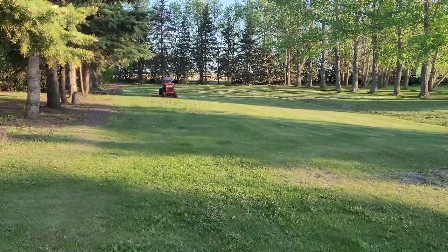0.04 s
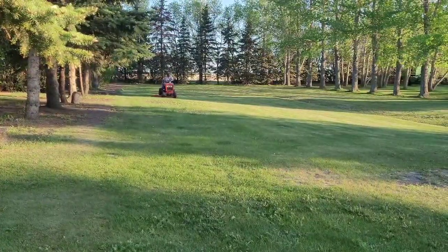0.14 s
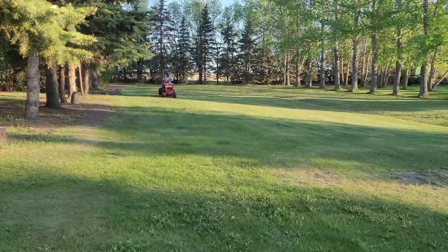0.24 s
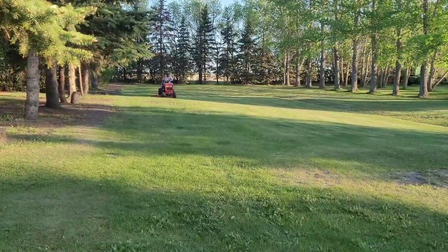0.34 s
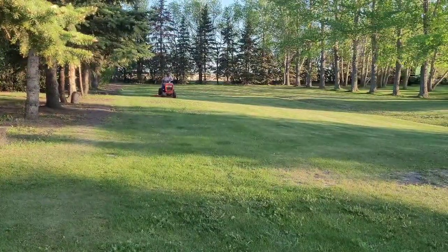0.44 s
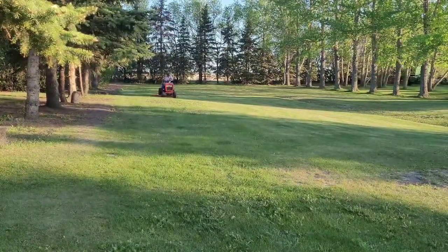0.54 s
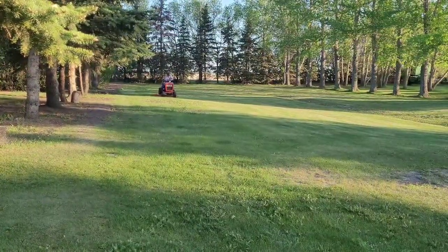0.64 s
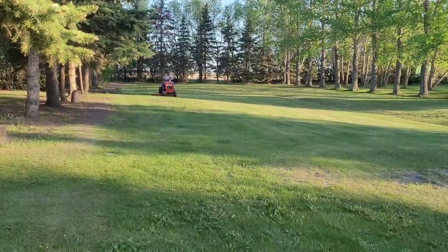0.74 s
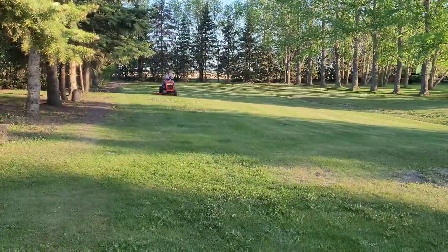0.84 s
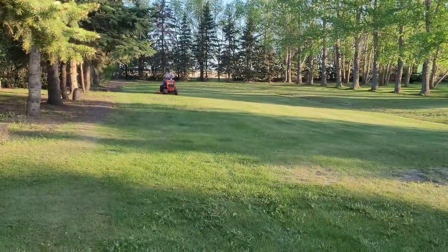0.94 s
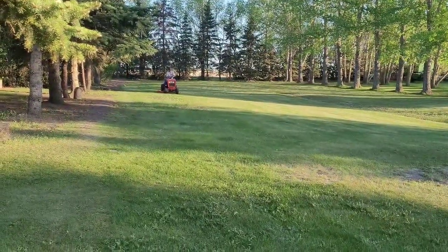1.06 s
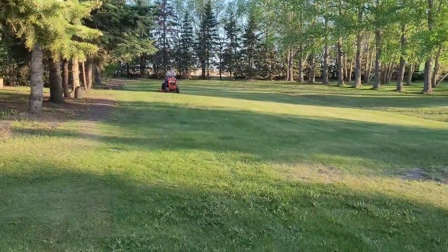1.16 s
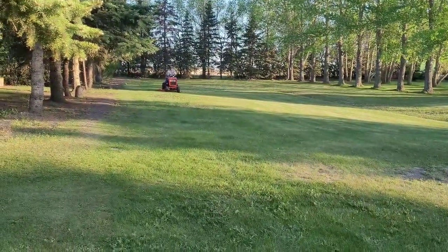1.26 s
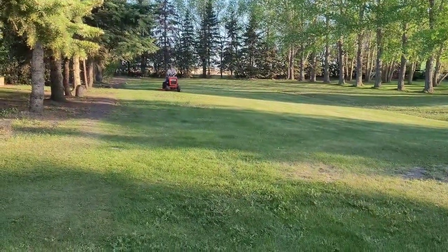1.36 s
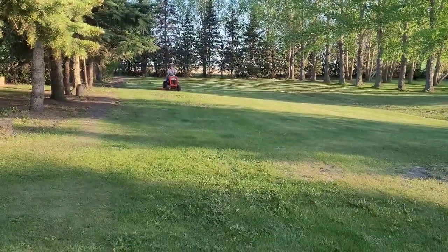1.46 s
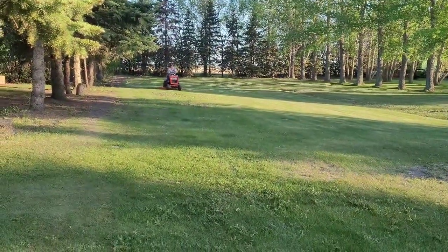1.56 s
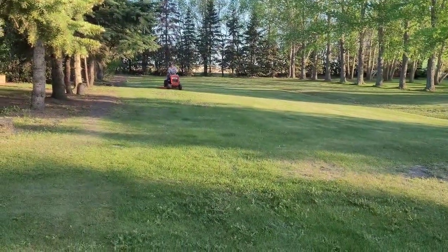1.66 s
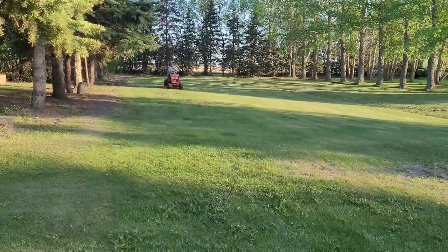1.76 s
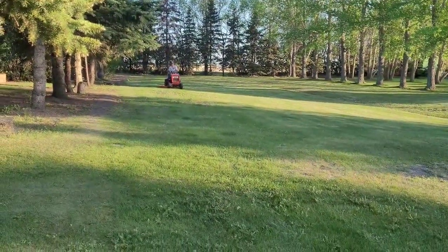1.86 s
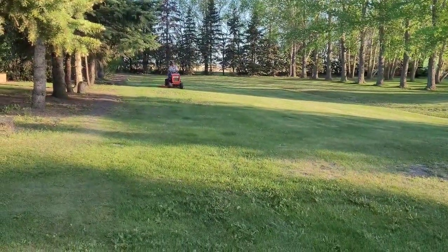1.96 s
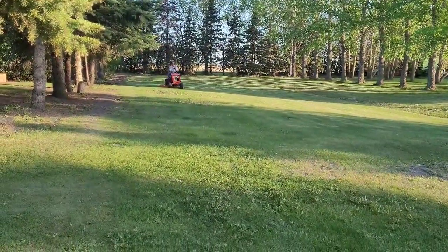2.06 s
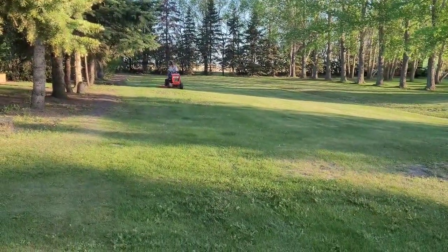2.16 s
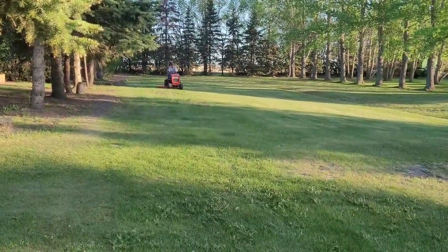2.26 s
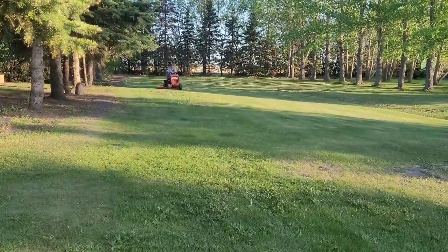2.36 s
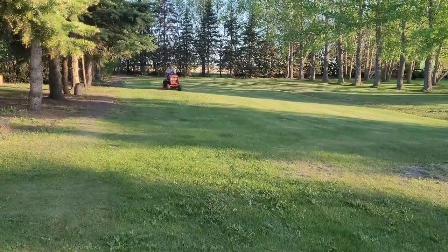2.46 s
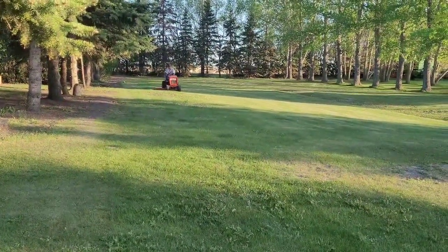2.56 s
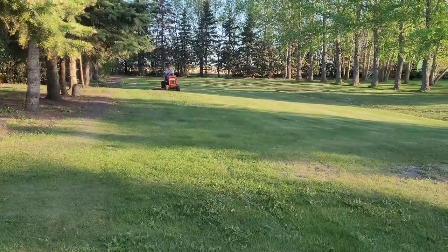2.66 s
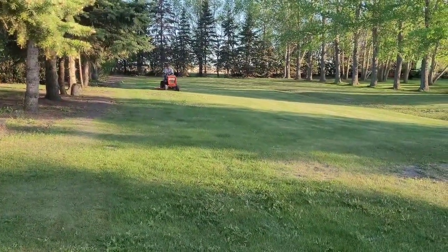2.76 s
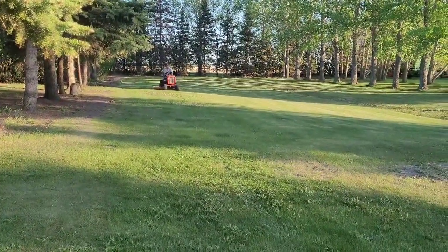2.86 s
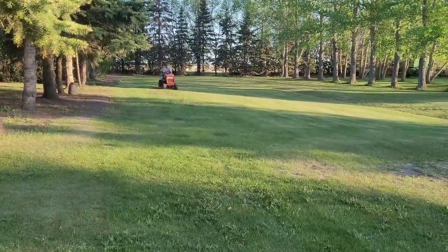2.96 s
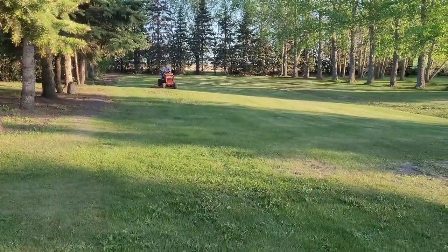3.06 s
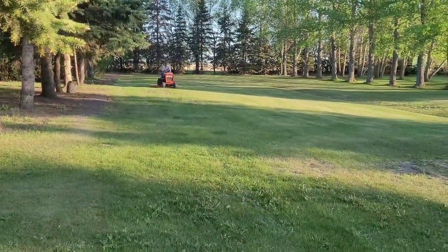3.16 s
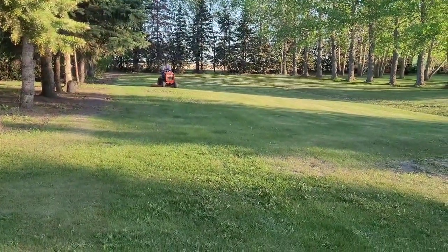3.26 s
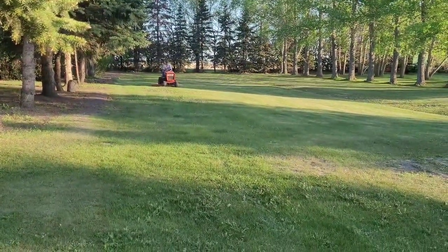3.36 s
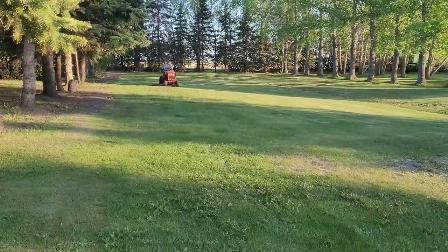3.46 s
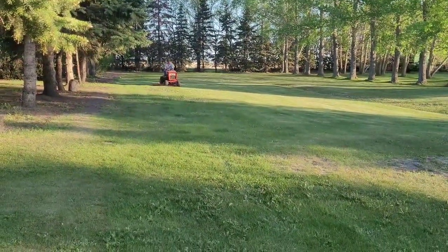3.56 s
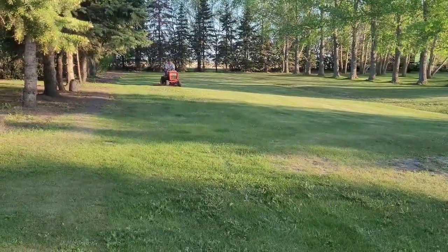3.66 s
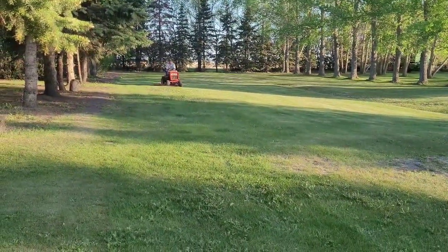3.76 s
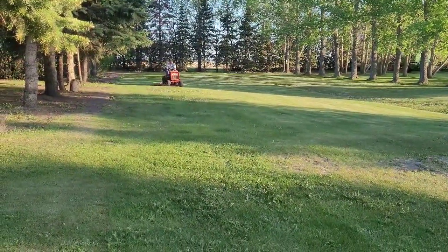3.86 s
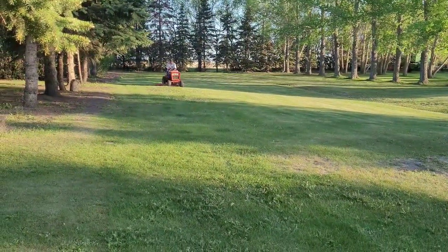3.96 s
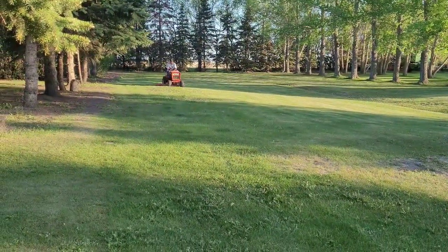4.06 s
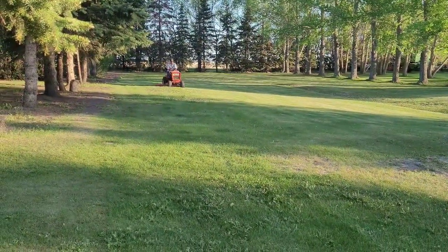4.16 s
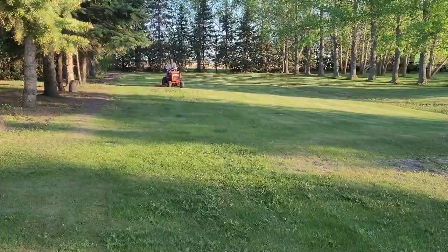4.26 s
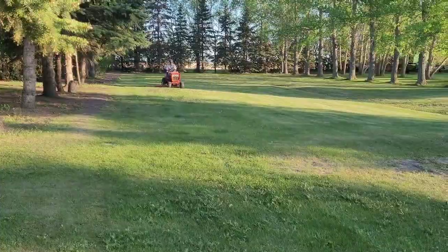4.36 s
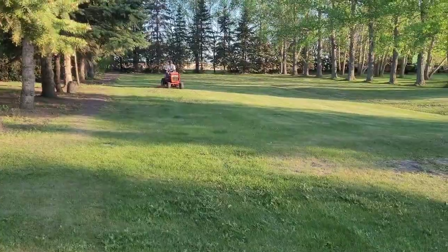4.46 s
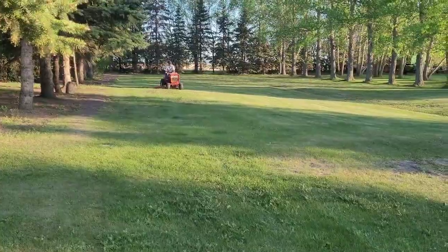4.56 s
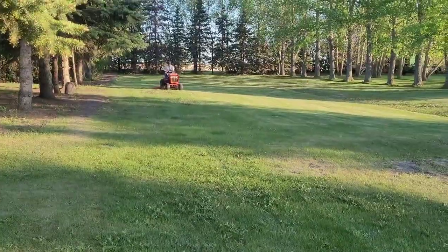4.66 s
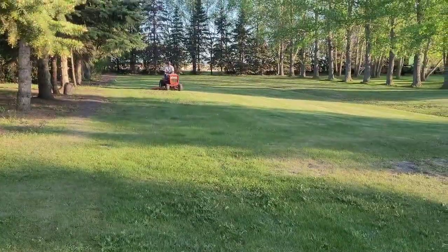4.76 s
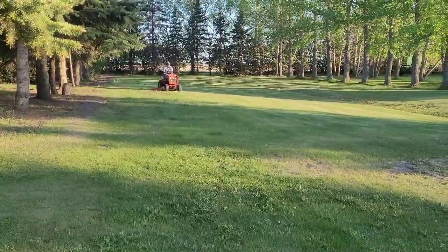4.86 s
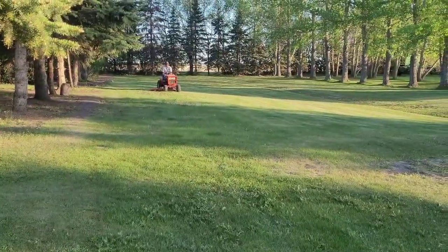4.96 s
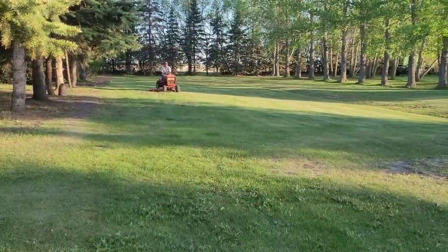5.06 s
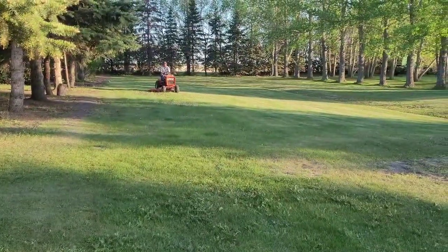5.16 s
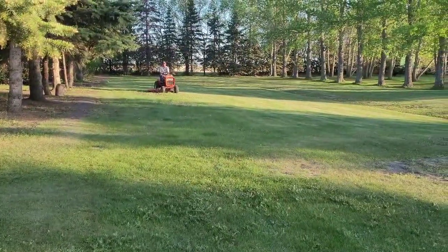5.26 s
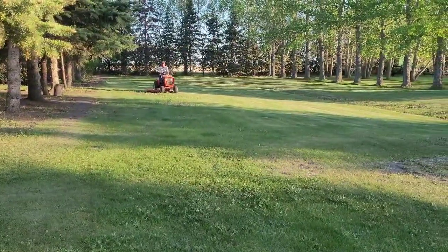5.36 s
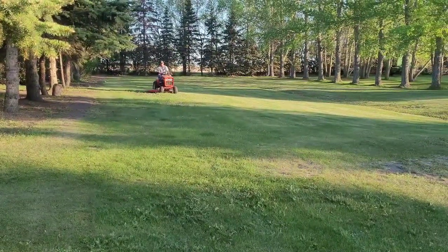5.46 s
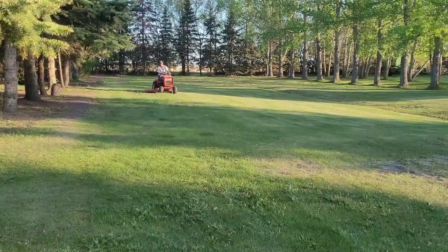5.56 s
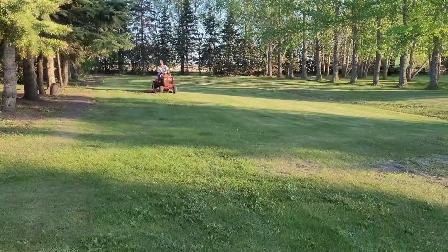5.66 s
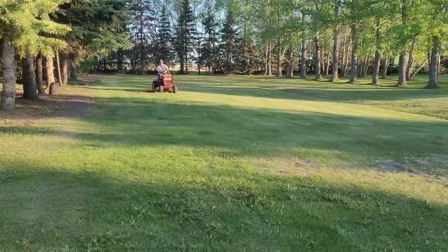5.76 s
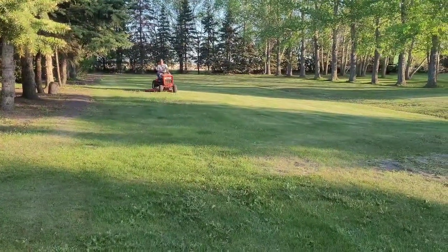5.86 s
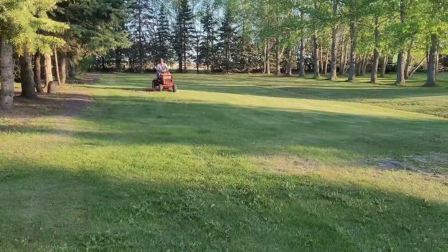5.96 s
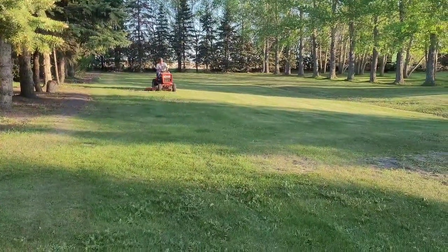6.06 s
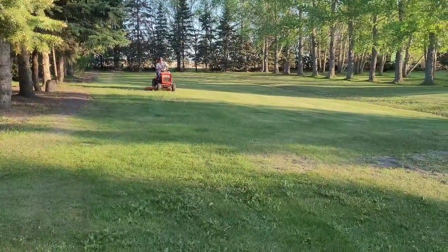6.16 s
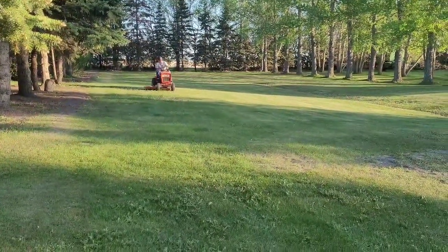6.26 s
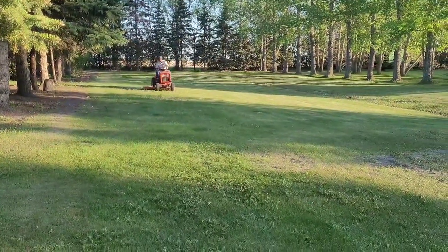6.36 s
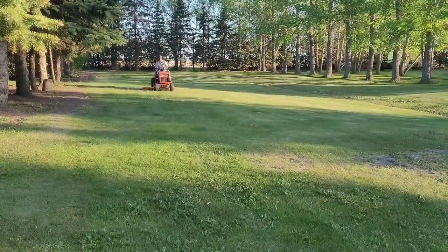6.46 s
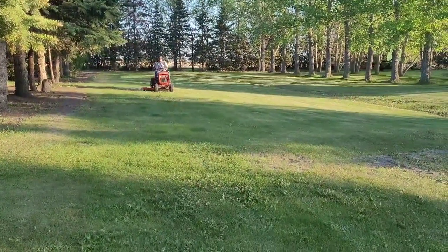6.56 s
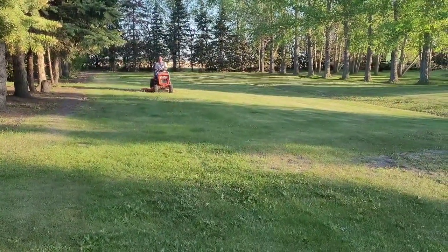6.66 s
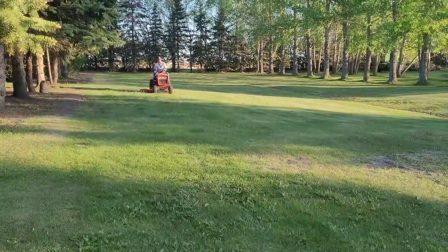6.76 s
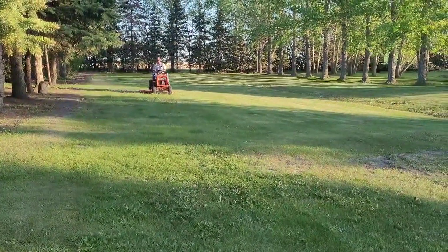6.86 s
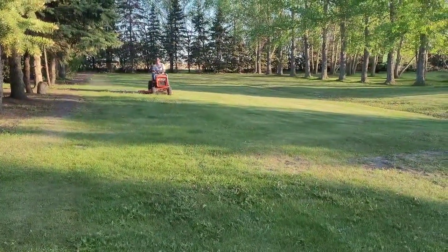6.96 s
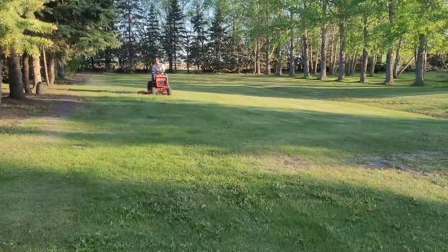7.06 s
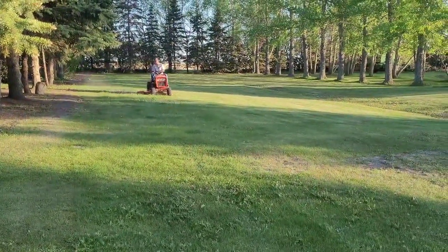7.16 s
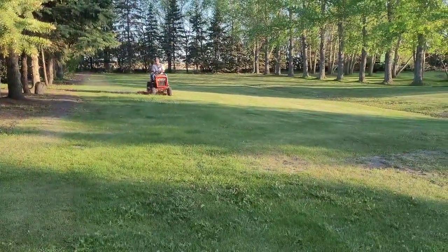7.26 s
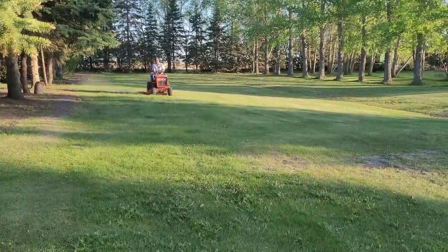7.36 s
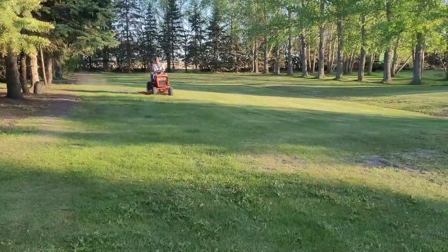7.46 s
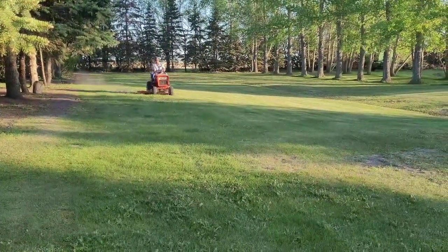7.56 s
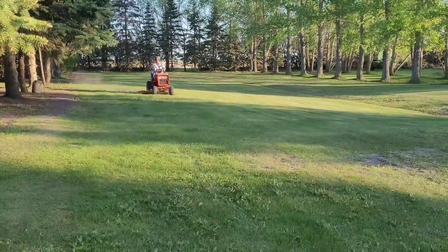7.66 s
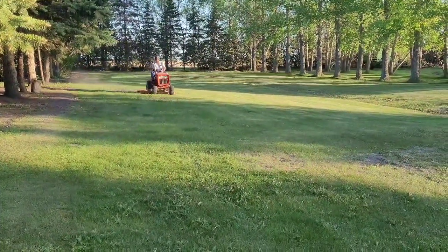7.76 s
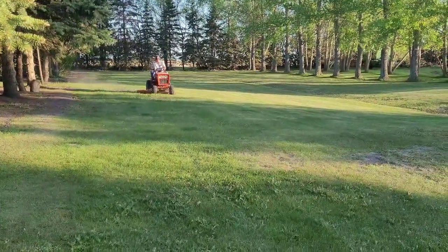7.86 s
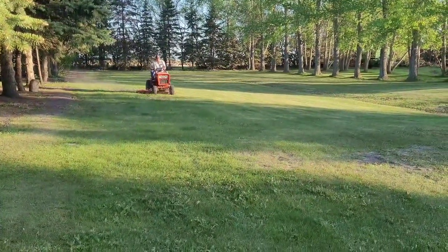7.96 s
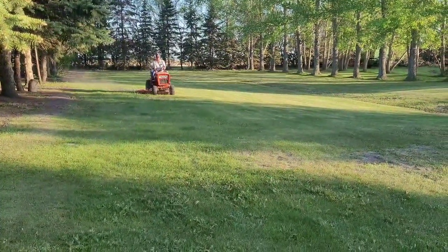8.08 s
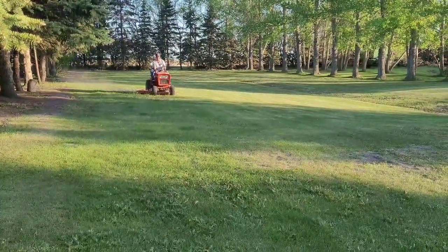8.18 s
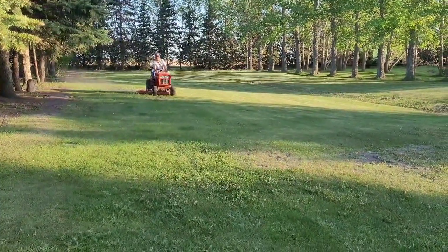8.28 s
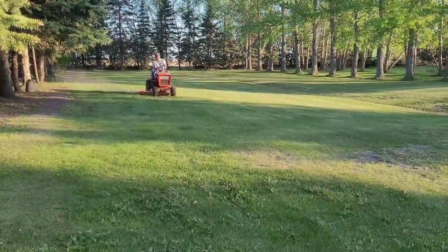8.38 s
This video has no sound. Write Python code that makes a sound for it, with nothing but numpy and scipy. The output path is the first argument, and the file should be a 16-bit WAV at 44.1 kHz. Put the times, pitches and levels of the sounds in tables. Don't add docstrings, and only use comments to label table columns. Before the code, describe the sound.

An old two-cylinder garden tractor putters across a lawn, sags, stumbles on one cylinder, then revs up loudly with a rattling mower-deck roar.

```python
import sys
import numpy as np
from scipy import signal
from scipy.io import wavfile
from scipy.ndimage import map_coordinates

SR = 44100
rng = np.random.default_rng(int(sys.argv[2]) if len(sys.argv) > 2 else 0)


def wav_out(sig):
    wavfile.write(sys.argv[1], SR, np.round(np.clip(np.atleast_2d(sig).T, -1, 1) * 32767).astype(np.int16))


def gain_from_decibels(decibels):
    exponent = np.asarray(decibels, float) / 20
    return 10 ** exponent


N = 371322


def rms_one(x):
    return x / np.sqrt(np.mean(x ** 2) + 1e-20)


def in_time(rows, s=None):
    t, *columns = np.transpose(rows)
    if s is None:
        s = np.arange(N) / SR
    return [np.interp(s, t, column) for column in columns]


def drift(rate):
    r = np.exp(-80 * np.pi * rate / SR)
    white = rng.standard_normal(N // 40 + 2002)
    slow = signal.lfilter([1], [1, -2 * r, r * r], white)[2000:]
    return np.interp(np.arange(N) / 40, np.arange(len(slow)), rms_one(slow))


def two_pole(hz, width):
    r = np.exp(-np.pi * width / SR)
    return [(1 - r * r) / 2, 0, (r * r - 1) / 2], [1, -2 * r * np.cos(2 * np.pi * hz / SR), r * r]


def resonance(x, hz, width):
    return signal.lfilter(*two_pole(hz, width), x)


def gliding(x, s, hz, width):
    state, out = np.zeros(2), np.zeros(N)
    edges = np.r_[0, (s[1:] * SR).astype(int), N]
    for a, b, f in zip(edges, edges[1:], hz):
        out[a:b], state = signal.lfilter(*two_pole(f, width), x[a:b], zi=state)
    return out


def cut(x, hz, kind, order=2):
    return signal.sosfilt(signal.butter(order, hz, kind, fs=SR, output="sos"), x)


def cut_zero_phase(x, hz, kind, order=2):
    return signal.sosfiltfilt(signal.butter(order, hz, kind, fs=SR, output="sos"), x)


def shelf(x, hz, gain_db):
    return x + (gain_from_decibels(gain_db) - 1) * cut_zero_phase(x, hz, "high")


# (t/s, firing rate f/Hz)
CRANK_SPEED = [(0.0, 24.535), (0.4, 24.599), (0.8, 24.669), (1.2, 25.045), (1.4, 24.743), (1.55, 23.776),
               (1.7, 22.317), (1.85, 22.081), (2.0, 22.405), (2.15, 21.896), (2.3, 21.048), (2.45, 20.464),
               (2.6, 19.994), (2.75, 19.462), (2.9, 19.061), (3.05, 18.754), (3.2, 19.162), (3.35, 20.294),
               (3.5, 21.671), (3.65, 22.893), (3.8, 23.107), (3.95, 22.732), (4.1, 22.145), (4.25, 21.806),
               (4.4, 21.67), (4.55, 22.125), (4.7, 22.891), (4.85, 24.1), (5.0, 25.93), (5.15, 27.684),
               (5.3, 29.663), (5.45, 31.95), (5.6, 34.174), (5.75, 36.327), (5.9, 38.274), (6.05, 39.897),
               (6.2, 41.039), (6.35, 41.614), (6.6, 42.631), (6.8, 42.648), (7.0, 41.246), (7.2, 41.516),
               (7.4, 41.919), (7.6, 42.446), (7.8, 42.515), (8.0, 41.894), (8.2, 41.457), (8.4, 41.651),
               (8.43, 41.844)]
# (t/s, thump A level/dB, thump B level/dB, crack A level/dB, crack B level/dB)
COMBUSTION = [(0.0, -25.5, -26.4, -46.2, -54.6), (0.2, -25.1, -26.1, -48.5, -46.9),
              (0.4, -24.7, -25.4, -44.9, -48.0), (0.6, -24.5, -25.3, -46.4, -42.4),
              (0.8, -25.4, -26.4, -45.4, -47.8), (1.0, -23.9, -25.6, -46.7, -46.1),
              (1.2, -23.6, -25.4, -45.9, -47.0), (1.4, -24.5, -25.2, -41.1, -45.3),
              (1.6, -24.4, -26.8, -46.0, -45.1), (1.8, -24.5, -27.5, -42.7, -50.4),
              (2.0, -25.8, -27.9, -43.9, -48.1), (2.2, -25.0, -27.0, -47.0, -50.5),
              (2.4, -22.4, -24.2, -45.0, -47.8), (2.6, -25.7, -26.4, -45.4, -48.1),
              (2.8, -24.7, -26.7, -48.2, -43.6), (3.0, -24.7, -26.7, -47.7, -51.3),
              (3.1, -26.6, -27.4, -43.3, -49.0), (3.2, -23.7, -27.2, -36.8, -41.5),
              (3.3, -25.1, -26.7, -34.2, -37.9), (3.4, -23.8, -25.3, -35.1, -42.4),
              (3.5, -23.7, -24.5, -31.3, -34.1), (3.6, -22.4, -24.8, -27.6, -37.0),
              (3.7, -25.0, -24.9, -46.6, -36.6), (3.8, -28.4, -25.1, -58.8, -32.0),
              (3.9, -29.9, -24.9, -54.5, -29.2), (4.0, -31.1, -25.6, -55.9, -27.9),
              (4.1, -29.7, -24.7, -54.4, -31.8), (4.2, -32.1, -26.1, -54.1, -35.0),
              (4.3, -34.7, -25.8, -54.2, -34.8), (4.4, -24.4, -26.2, -43.8, -35.4),
              (4.5, -25.7, -24.8, -41.1, -32.5), (4.6, -19.9, -24.8, -14.5, -35.4),
              (4.7, -21.0, -24.3, -26.7, -32.8), (4.8, -22.3, -23.6, -27.4, -30.8),
              (4.9, -20.6, -25.0, -24.0, -30.4), (5.0, -20.7, -23.0, -29.3, -31.0),
              (5.1, -19.2, -21.6, -25.7, -27.3), (5.2, -19.1, -25.7, -22.5, -31.7),
              (5.3, -19.8, -22.0, -26.3, -25.5), (5.4, -17.9, -20.8, -22.2, -26.5),
              (5.5, -16.0, -20.2, -20.4, -27.4), (5.6, -15.9, -18.7, -23.7, -25.5),
              (5.7, -15.4, -20.2, -25.0, -30.8), (5.8, -17.7, -20.1, -23.6, -24.6),
              (5.9, -17.0, -19.3, -25.5, -32.2), (6.0, -15.5, -18.6, -24.5, -26.7),
              (6.1, -16.6, -19.1, -24.6, -32.9), (6.2, -16.4, -18.5, -26.1, -31.1),
              (6.3, -15.5, -19.2, -28.8, -36.4), (6.4, -16.9, -19.1, -29.4, -31.8),
              (6.5, -18.7, -21.1, -28.5, -30.3), (6.6, -15.6, -18.7, -30.3, -33.6),
              (6.7, -19.2, -18.5, -38.3, -36.1), (6.8, -18.0, -23.2, -31.5, -39.5),
              (6.9, -16.2, -20.6, -27.2, -36.6), (7.0, -19.3, -18.3, -34.3, -30.6),
              (7.1, -16.7, -19.0, -29.1, -38.9), (7.2, -19.4, -22.1, -30.4, -33.1),
              (7.3, -16.8, -19.7, -32.4, -36.9), (7.4, -17.4, -19.6, -27.8, -37.0),
              (7.5, -16.8, -19.5, -30.3, -34.7), (7.6, -15.1, -17.7, -32.0, -38.0),
              (7.7, -16.9, -17.1, -30.7, -32.5), (7.8, -14.1, -18.0, -28.2, -35.2),
              (7.9, -15.8, -18.3, -29.7, -40.8), (8.0, -15.4, -17.9, -32.0, -41.0),
              (8.1, -16.3, -19.0, -30.9, -36.3), (8.2, -15.4, -17.4, -31.0, -34.4),
              (8.3, -15.1, -17.5, -33.1, -38.0), (8.42, -16.8, -17.8, -27.3, -38.1)]
# (t/s, thump level/dB, crack level/dB)
ODD_FIRINGS = [(.531, 0.5, 5.0), (1.379, -1.5, 1.5), (2.032, 3.5, 4), (4.457, -2.5, -11), (4.548, 1, 5.5),
               (4.637, 0.0, -4.5), (4.891, 0, 0.5), (5.087, 0.0, -1), (5.965, 0, 0.5), (6.066, 0.5, 1.5),
               (6.737, -1.5, -17), (6.761, -1, -6), (6.831, 2, 5.5), (6.855, -38, -6), (6.974, 0.5, 0),
               (7.36, 1.5, 2), (7.832, -0.5, 2.5)]
# (start t/s, end t/s, delay/ms)
DROPOUT_A = (3.72, 4.34, 6.2)


def firings():
    first_firing_s = .0032
    turns = np.cumsum(in_time(CRANK_SPEED)[0]) / SR
    turns -= np.interp(first_firing_s * SR, np.arange(N), turns)
    s = np.interp(np.arange(int(turns[-1]) + 1), turns, np.arange(N) / SR)
    thump_a, thump_b, crack_a, crack_b = in_time(COMBUSTION, s)
    is_a = np.arange(len(s)) % 2 == 0
    chance = rng.standard_normal((len(s), 2))
    odd = np.zeros((len(s), 2))
    for at, *db in ODD_FIRINGS:
        odd[np.argmin(abs(s - at))] = db
    thump_db = np.where(is_a, thump_a, thump_b - .4) + odd[:, 0] + 0.2 * chance[:, 0]
    crack_db = np.where(is_a, crack_a, crack_b - .4) + odd[:, 1] + 1.25 * chance[:, 1]
    start_s, end_s, delay_ms = DROPOUT_A
    late = is_a & (s > start_s) & (s < end_s)
    return s + delay_ms / 1000 * late, thump_db, crack_db


def since(s, lead_s):
    t = np.arange(N) / SR
    latest = np.clip(np.searchsorted(s - lead_s, t) - 1, 0, None)
    return latest, np.clip(t - s[latest] + lead_s, 0, None)


def roar(modes, s, throb, patchy_db, diffuse_db):
    latest, age = since(s, lead_s=0.0025)
    jolt = rng.exponential(1, len(s))
    shake = 1 + throb * jolt[latest] * np.exp(-age / 0.0035)
    together, out = drift(8.2), np.zeros((3, N))
    white = rng.standard_normal((2, 3, N))
    for k, (hz, width, db) in enumerate(modes):
        flicker_db = patchy_db * (0.54 * together + drift(25.0))
        driven = gain_from_decibels(db + flicker_db) * shake * white[k % 2]
        out += resonance(driven, hz, max(width, hz / 12))
    return rms_one(out) * gain_from_decibels(np.array([[0], [diffuse_db], [diffuse_db]]))


# (t/s, deck level/dB, fan and grass hiss level/dB, rumble level/dB)
ROAR_LEVELS = [(0.0, -53, -75, -49), (0.3, -52.5, -64, -48.5), (0.47, -51.5, -60, -47.5),
               (0.94, -51.5, -79, -50.5), (1.45, -53, -74, -50), (1.85, -53.5, -59, -48),
               (2.34, -53.5, -64, -52), (2.98, -53.5, -74, -53), (3.19, -52, -74, -50),
               (3.4, -49.5, -69, -51.5), (3.49, -50, -71, -49.5), (3.63, -47.5, -54.5, -50),
               (3.87, -49.5, -76, -48.5), (4.1, -50.5, -66, -49), (4.36, -47.5, -65, -50),
               (4.55, -49, -64, -48), (4.76, -46.5, -48, -47.5), (5.07, -43, -64, -46),
               (5.25, -42, -62, -43), (5.49, -40, -55, -44), (5.68, -39.5, -55, -40.5),
               (5.93, -38, -54, -39.5), (6.59, -37, -59, -40.5), (6.71, -38.5, -49, -38.5),
               (7.11, -36, -43, -38.5), (7.36, -37.5, -55, -39), (7.65, -35.5, -56, -37),
               (7.9, -38, -36, -36.5), (8.23, -37, -35, -38.5), (8.42, -37.5, -38, -40)]


def roar_levels():
    return in_time(ROAR_LEVELS)


# (f/Hz, width/Hz, level/dB)
RUMBLE_MODES = [(85, 23, -1), (179, 37, -3), (254.3, 18, -2)]


def pipe_rumble(s):
    return cut(roar(RUMBLE_MODES, s, throb=0.5, patchy_db=1.5, diffuse_db=-5.0), 379, "low", order=3)


# (f/Hz, width/Hz, level/dB)
FAN_MODES = [(6050, 290, 29), (7300, 200, 9), (9500, 1200, -55.5), (11300, 300, -8.5), (13500, 330, 2.5),
             (14800, 840, -21.5)]


def fan_hiss(s):
    return roar(FAN_MODES, s, throb=1.1, patchy_db=1.8, diffuse_db=-3.0)


# (f/Hz, width/Hz, level/dB)
DECK_MODES = [(518, 150, -6.5), (604, 120, 1.5), (747, 162, 1.5), (1257, 180, 2.5), (1940, 350, -4),
              (2320, 230, -7.5), (2800, 196, -5.5), (3180, 180, -6.5), (3840, 83, -6), (5200, 230, -12)]


def deck_roar(s):
    return cut(roar(DECK_MODES, s, throb=.6, patchy_db=1.2, diffuse_db=-6.0), 430, "high", order=3)


# (t/s, level/dB)
RUSTLE_LEVELS = [
    (4.03, -90.0),
    (4.06, -64),
    (4.1, -52),
    (4.14, -59.5),
    (4.19, -90.0),
]


def grass_rustle():
    spiky = rng.standard_normal((2, N)) ** 3 / 4
    return gain_from_decibels(in_time(RUSTLE_LEVELS)[0]) * cut(spiky, 8000, "high")


# (delay t/s, level/dB)
REFLECTIONS = [
    (.0045, -5.0),
    (.011, -11.0),
    (.021, -15.0),
    (.036, -19.0),
]


def echoes(x):
    dull, out = cut(x, 9500, "low", order=1), np.zeros((2, N))
    for delay_s, db in REFLECTIONS:
        for side, skew in enumerate((.7, 1.3)):
            lag = int(delay_s * skew * SR)
            out[side, lag:] += gain_from_decibels(db) * dull[:N - lag]
    return out


# (t/s, treble above 9 kHz level/dB, tinwork above 3 kHz level/dB)
NOSE_AIM = [(0, -5, 0), (1.5, -11, 2.5), (3.05, -3, -0.5), (3.2, -0.5, 0.5), (4.5, -3, 0.5), (5.5, -3, 0.5),
            (6.5, .5, -1), (7.3, 2.5, -2.5), (8.42, 7.5, -6)]


def aimed(x):
    treble_db, tin_db = in_time(NOSE_AIM)
    return shelf(shelf(x, 3000, tin_db), 9000, treble_db)


# (f/Hz, width/Hz, level/dB)
MUFFLER_MODES = [(1360, 140, -12), (1960, 210, -14), (2315, 170, -7), (2870, 50, -28), (3442, 160, -3.5),
                 (3985, 86, -13), (5380, 290, -16.5), (6060, 1050, -20), (7820, 290, -16),
                 (10470, 320, -25.5), (12800, 1200, -22), (15200, 830, -28)]


def muffler_crack(s, crack_db):
    latest, age = since(s, lead_s=0.0036)
    snap = (age / 0.00099) ** 2 * np.exp(-age / 0.00098)
    tail = 0.097 * (1 - np.exp(-age / 0.0045)) * np.exp(-age / 0.019)
    burst = snap + tail
    colour_db = 3.0 * rng.standard_normal((len(s), len(MUFFLER_MODES)))
    colour_db[:, 6:] += 1.6 * rng.standard_normal((len(s), 1))
    colour_db[1::2, 1:3] += [4.0, -5.0]
    colour_db[1::2, 6:] -= 2.5
    out = np.zeros(N)
    for k, (hz, width, db) in enumerate(MUFFLER_MODES):
        driven = burst * gain_from_decibels(db + colour_db[latest, k]) * rng.standard_normal(N)
        out += resonance(driven, hz, max(width, hz / 15))
    energy = np.bincount(latest, out ** 2) / SR
    return out * (gain_from_decibels(crack_db - 25.5) / np.sqrt(energy + 1e-20))[latest]


# (t/s, blast length/ms, first mode f/Hz, second mode f/Hz, bottom level/dB, upper level/dB)
PIPE_OUTLET = [(0, 5.2, 103.2, 235, -11.5, .5), (1.4, 5.4, 112.3, 240, -12.5, 3),
               (1.9, 5.5, 101.4, 210, -11, -3.5), (2.7, 6.66, 109, 194.5, -7.0, 5),
               (3.3, 3.56, 101, 223, -5.0, -14), (4.0, 4.16, 98.4, 242, -1, -10.5),
               (4.7, 4.5, 103.6, 222, 1.5, -5.5), (5.3, 4.9, 97, 219.4, 2.5, -0.5),
               (5.8, 4.67, 106, 227.5, -15, 1.5), (6.3, 4, 118.8, 218, -4.5, -3.5),
               (7.3, 3.8, 124.5, 205, -22, -6), (8.42, 3.6, 124, 217, -16, -7.5)]
# (t/s, share 0-1)
END_REFLECTION = [(0, .95), (1.5, .9), (2.7, .55), (3.3, .25), (4.5, .1), (5.2, 0), (8.42, 0)]
# (bottom mode f/Hz, bottom width/Hz, first width/Hz, second width/Hz)
PIPE_LOW_MODES = (71.7, 20.4, 24.1, 26)
# (f/Hz, width/Hz, level/dB)
CHAMBERS = [(166.6, 25, -9.5), (262.6, 72, -5.5)]


def exhaust_thump(s, thump_db):
    blast_ms, first_hz, second_hz, bottom_db, upper_db = in_time(PIPE_OUTLET, s)
    returned, = in_time(END_REFLECTION, s)
    bottom_hz, bottom_width, first_width, second_width = PIPE_LOW_MODES
    latest, age = since(s, lead_s=0.0023)
    longer_b = np.where(latest % 2, 1.08, 1)
    length_s = np.clip(blast_ms[latest] * longer_b, 1, 8) / 1000

    def puff(late_s):
        return np.sin(np.pi * np.clip((age - late_s) / length_s, 0, 1)) ** 2 / length_s

    blast = (returned[latest] * puff(0.003626) - puff(0)) * gain_from_decibels(thump_db[latest] - 36)
    upper = blast * gain_from_decibels(upper_db[latest])
    out = resonance(blast * gain_from_decibels(bottom_db[latest]), bottom_hz, bottom_width)
    out += gliding(blast, s, first_hz, first_width)
    out += gliding(upper, s, second_hz, second_width)
    for hz, width, db in CHAMBERS:
        out += gain_from_decibels(db) * resonance(upper, hz, width)
    return cut_zero_phase(out, 340, "low", order=3)


def ports(x, shade_db):
    left_lead_samples = 3.17
    treble = cut(x, 850, "high", order=1)
    left = x + (gain_from_decibels(shade_db / 2) - 1) * treble
    shaded = x + (gain_from_decibels(-shade_db / 2) - 1) * treble
    right = map_coordinates(shaded, [np.arange(N) - left_lead_samples], order=3, mode="nearest")
    return np.array([left, right])


def scene():
    s, thump_db, crack_db = firings()
    deck_db, fan_db, rumble_db = roar_levels()
    crack = muffler_crack(s, crack_db)
    bright = gain_from_decibels(deck_db) * deck_roar(s) + gain_from_decibels(fan_db - 13) * fan_hiss(s)
    bright[0] += crack
    bright[1:] += echoes(crack)
    steady = aimed(bright) + gain_from_decibels(rumble_db + 4.5) * pipe_rumble(s)
    steady[1:] += grass_rustle()
    direct = exhaust_thump(s, thump_db) + steady[0]
    return ports(direct, shade_db=5.0) + steady[1:]


def low_pass(x):
    return signal.sosfilt(signal.butter(12, 16650, fs=SR, output="sos"), x)


def record(dry):
    wind_cut = cut_zero_phase(dry, 34, "high")
    mix = cut(wind_cut, 15200, "low", order=12)
    return low_pass(mix)


dry = scene()
out = record(dry)
wav_out(out)
```